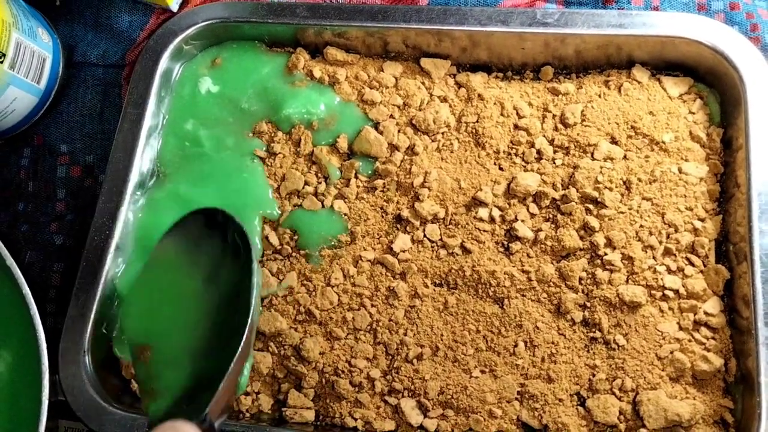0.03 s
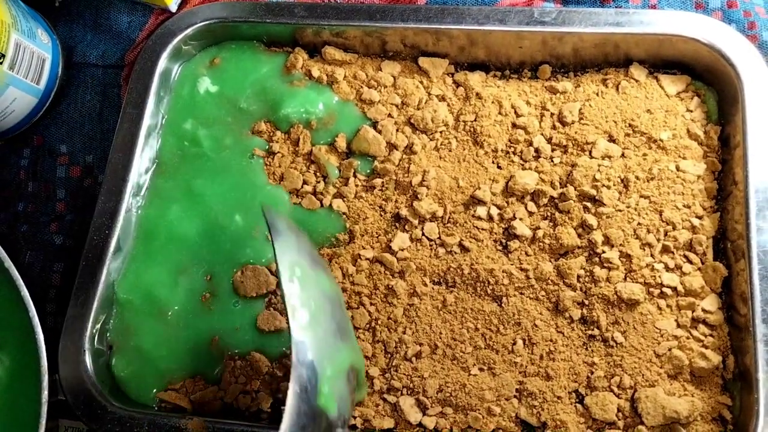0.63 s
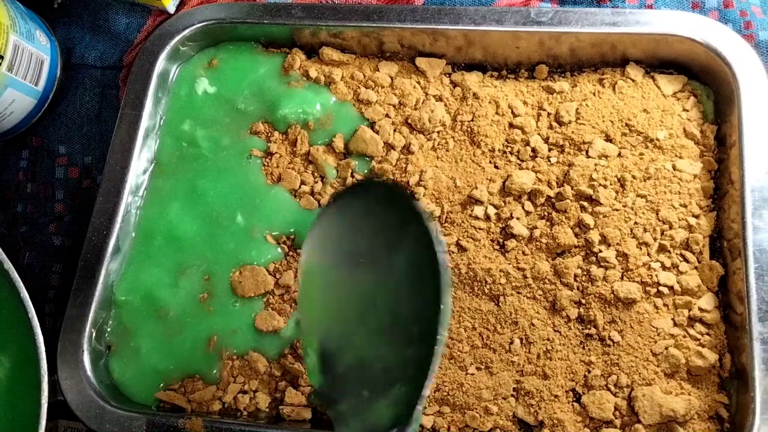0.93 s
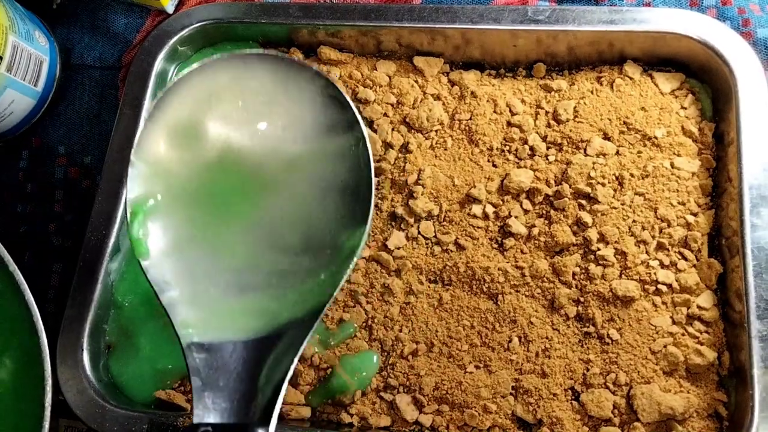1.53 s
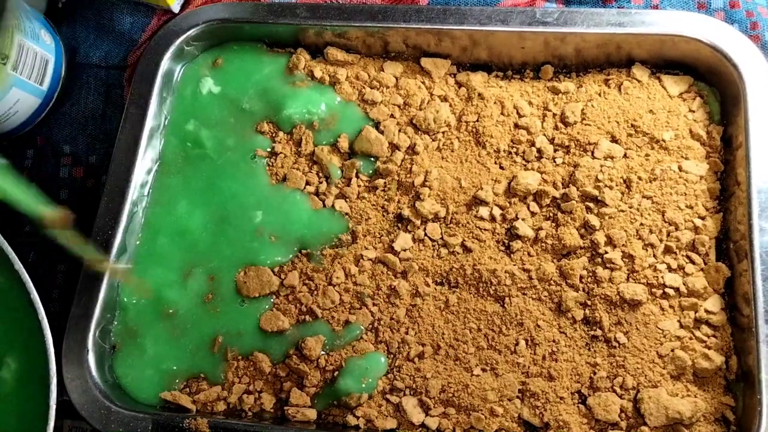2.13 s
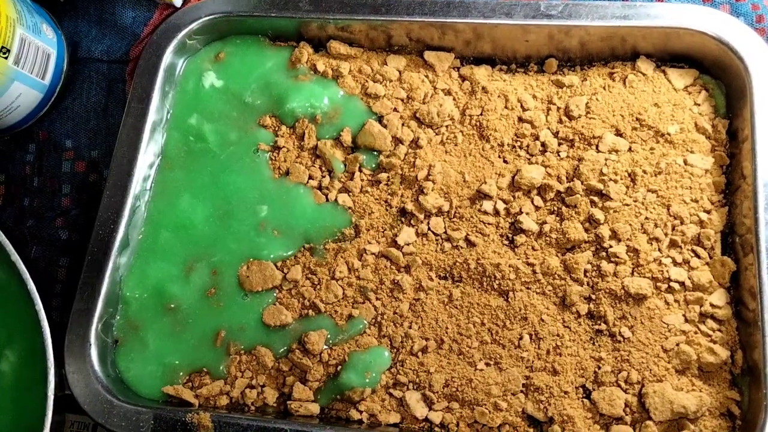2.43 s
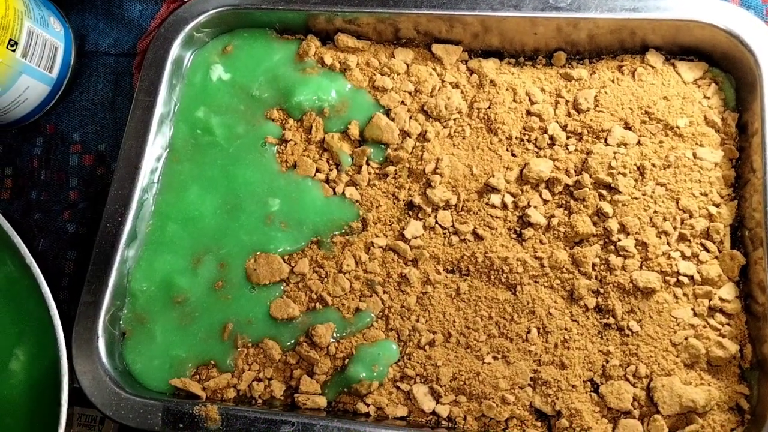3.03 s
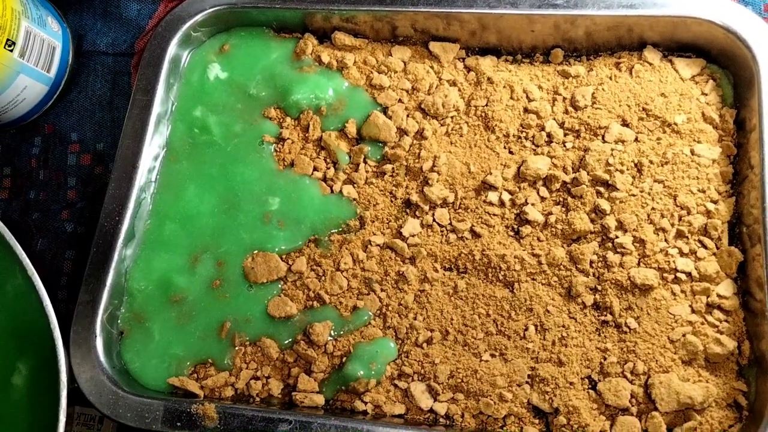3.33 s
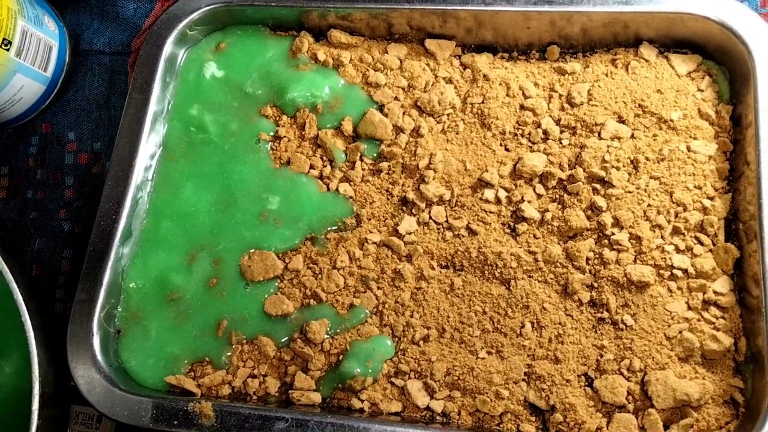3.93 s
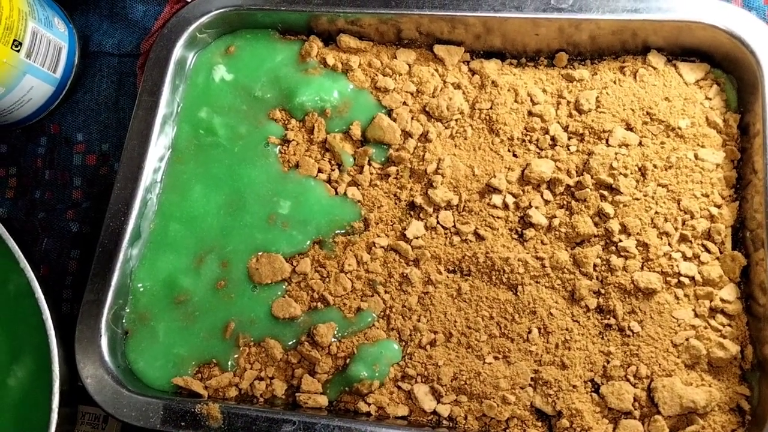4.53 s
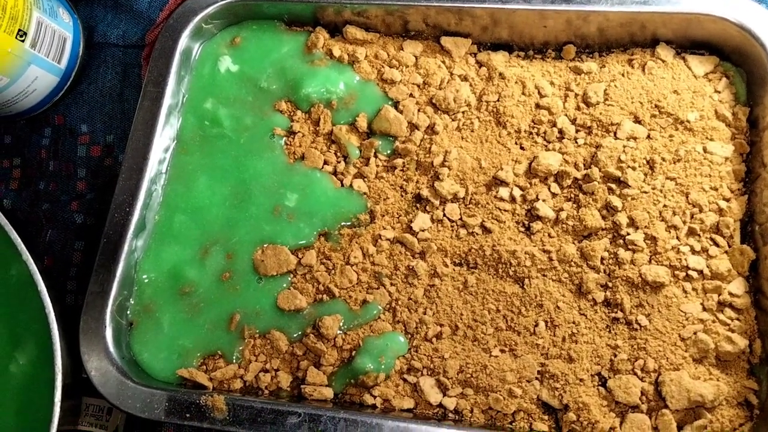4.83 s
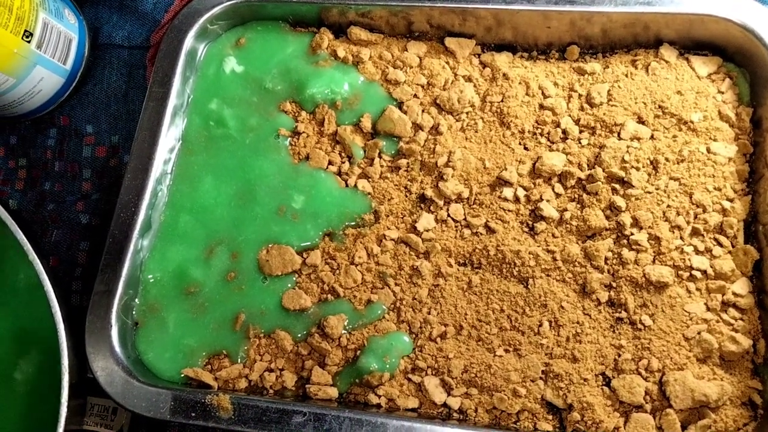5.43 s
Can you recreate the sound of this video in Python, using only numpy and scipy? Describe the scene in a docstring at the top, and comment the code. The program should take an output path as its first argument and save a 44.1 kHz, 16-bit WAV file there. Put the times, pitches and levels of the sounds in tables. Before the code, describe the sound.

A cream-coated metal spoon clinks a few times as it is laid in a metal bowl, then scrapes briefly, over a faint hum.

```python
"""Tiny wet smacks, then short metal clinks and a scrape: a creamy steel spoon is laid in a metal bowl.
The smacks are cream peeling off the spoon as it lifts from a tray of cream and crumbs.
The spoon knocks twice, drops, tips against the rim and slides to rest. Each knock rings bowl and spoon,
but the cream soon stops them. In the quiet kitchen an appliance hums; faint hoots come from afar."""
import sys
import numpy as np
from scipy import signal
from scipy.fft import rfft, irfft
from scipy.io import wavfile

SR = 44100
rng = np.random.default_rng(int(sys.argv[2]) if len(sys.argv) > 2 else 0)


def materialize(psi):
    """Save the field psi as 16-bit PCM at rate SR to the path in sys.argv[1].

    A 1-D psi becomes a single channel; in a 2-D psi each row is a channel.
    """
    bounded = np.clip(np.atleast_2d(psi).T, -1, 1)
    quanta = np.round(bounded * 32767).astype(np.int16)
    wavfile.write(sys.argv[1], SR, quanta)


N = 246078
WALL, BOTTOM, RIM = 0, 1, 2  # places where the spoon hits the bowl


def amp(db):
    """Turns decibels into a number to multiply a sound by."""
    return 10 ** (np.asarray(db) / 20)


def unit(x):
    """Scales a sound to an average (rms) level of 1."""
    return x / np.sqrt(np.mean(x ** 2) + 1e-20)


def read_curve(points, hz):
    """Looks up a value between the (pitch_hz, value) points of a curve, on a musical pitch scale."""
    point_hz, value = np.transpose(points)
    return np.interp(np.log(hz + 1), np.log(point_hz + 1), value)


def add(mix, start_s, sound):
    """Mixes a sound in at the given time."""
    part = mix[round(start_s * SR):][:len(sound)]
    part += sound[:len(part)]


def colour(x, curve):
    """Makes each pitch louder or softer along a curve, then sets the level to 1."""
    gain = amp(read_curve(curve, np.fft.rfftfreq(len(x), 1 / SR)))
    return unit(irfft(rfft(x) * gain, len(x)))


def white(size):
    """Hiss that is equally strong at every pitch."""
    return unit(irfft(np.exp(2j * np.pi * rng.random(size // 2 + 1)), size))


def band(pitch_hz, spread_hz, size):
    """Noise around one pitch, reaching about spread_hz to each side."""
    hz = np.fft.rfftfreq(size, 1 / SR)
    return unit(irfft(rfft(white(size)) / (1 + ((hz - pitch_hz) / spread_hz) ** 4), size))


def fade(t, fade_s, rise_s):
    """A level that rises quickly, then falls by 60 dB every fade_s."""
    return (1 - np.exp(-t / rise_s)) * np.exp(-np.log(1000) * t / fade_s)


def room_noise(level_db=-57.5):
    """A soft, steady rush in which a few pitches stand out."""
    # tone of the rush: pitch_hz, relative_db
    air_curve = [(20, 3), (40, -2), (75, -3.5), (103, -12.5), (135, -1.5), (200, -6), (420, -17),
                 (1400, -20), (1550, -23.5), (2000, -24), (2500, -29.5), (3500, -33.5), (5800, -35.5),
                 (7000, -31), (7600, -27), (8000, -39.5), (8600, -55)]
    # pitches that stand out: pitch_hz, width_hz, level_db
    air_peaks = [(489, 55, -78), (656, 23, -79.5), (743, 16, -86), (874, 8.8, -80.5), (972, 89, -81),
                 (1288, 110, -82), (1383, 37, -79.5)]
    peaks = sum(amp(db) * band(hz, width_hz / 2, N) for hz, width_hz, db in air_peaks)
    return amp(level_db) * colour(white(N), air_curve) + peaks


def appliance_hum(waver=0.14):
    """An appliance hums on three low tones, each wavering a little in level."""
    # tones of the hum: pitch_hz, level_db
    hum_tones = [(120, -61.5), (301, -76), (355, -77.5)]
    out, t = np.zeros(N), np.arange(N) / SR
    for hz, db in hum_tones:
        tone = np.sqrt(2) * np.sin(2 * np.pi * (hz * t + rng.random()))
        out += amp(db) * tone * (1 + waver * band(0, 2.3, N))
    return out


def kitchen_echo(x, first_echo_s=.006, echoes_per_s=3000):
    """Sound bounces around the kitchen; the high pitches die first."""
    # how long the echo lasts: pitch_hz, fade_s
    echo_fades = [(100, 0.62), (1000, 0.26), (4000, 0.23), (8000, 0.19)]
    echoes = rng.choice([-1., 1.], 2 ** 15) * (rng.random(2 ** 15) < echoes_per_s / SR)
    echoes *= np.arange(len(echoes)) > first_echo_s * SR
    hz, t, spectrum = signal.stft(echoes, SR, nperseg=256)
    decay = np.exp(-np.log(1000) * t / read_curve(echo_fades, hz)[:, None])
    tail = signal.istft(spectrum * decay, SR, nperseg=256)[1]
    return signal.fftconvolve(x, tail / np.linalg.norm(tail))[:N]


def far_hoots(length_s=.095, spread_hz=140):
    """Short, soft hoots, blurred by distance."""
    # each hoot: start_s, level_db, pitch_hz
    hoots = [(.19, -67.5, 796), (.815, -65, 900), (1.274, -59.5, 1000), (3.105, -60, 840),
             (4.821, -65.5, 1360)]
    out, swell = np.zeros(N), signal.windows.tukey(int(length_s * SR), .7)
    for start_s, db, hz in hoots:
        add(out, start_s, amp(db) * band(hz, spread_hz, 2 ** 14)[:len(swell)] * swell)
    return out


def cream_smacks(spread_share=0.088):
    """Threads and films of cream snap with a short, high fizz."""
    # each snap: start_s, level_db, pitch_hz
    smacks = [(.157, -76, 5000), (0.6275, -66.5, 7200), (0.9962, -59, 6500), (1.0212, -56.5, 7260),
              (1.119, -71.5, 2570), (2.152, -67.5, 7170), (2.239, -67.5, 7150), (2.4753, -67.5, 7000),
              (2.725, -70, 7300), (2.818, -68.5, 7160), (3.057, -64.5, 7270), (3.315, -68, 6900)]
    out, t = np.zeros(N), np.arange(2 ** 14) / SR
    for start_s, db, hz in smacks:
        fizz = band(hz, spread_share * hz, len(t))
        add(out, start_s, amp(db) * fizz * fade(t, fade_s=.26, rise_s=0.00063))
    return out


def table_thud(t):
    """The table shakes briefly under the bowl."""
    # low tones of the table: pitch_hz, fade_s, relative_db
    table_tones = [(25.5, 0.18, -12), (136.2, 0.087, -1), (174, 0.15, -11.5)]
    return sum(amp(db) * fade(t, fade_s, rise_s=0.0057) * np.sin(2 * np.pi * hz * t)
               for hz, fade_s, db in table_tones)


def bowl_and_spoon_ring(place, t, treble_db=0, early_boost=0.7, early_fade_s=0.058, rise_cycles=1.5):
    """Bowl and spoon lose part of their swing to the cream at once, then ring on together."""
    # tones of bowl and spoon ringing together: pitch_hz, fade_s, wall_hit_db, bottom_hit_db, rim_hit_db
    bowl_and_spoon_tones = [(174, .16, -46, -48, -49), (195, .18, -45, -52, -45), (465, .14, -54, -49, -59),
                            (521, .12, -48, -34, -58), (560, .06, -58, -30, -55), (648, .07, -52, -44, -45),
                            (746, .23, -51, -59, -49), (794, .2, -61, -46, -58), (845, .15, -66, -42, -51),
                            (886, .18, -63, -46, -37), (931, .22, -67, -31, -52), (938, .12, -68, -54, -58),
                            (945, .05, -60, -23, -46), (1265, .16, -54, -52, -47),
                            (1305, .2, -43, -56, -52), (1340, .14, -49, -38, -60),
                            (1394, .21, -56, -44, -59), (1500, .07, -48, -54, -51),
                            (1958, .08, -45, -51, -52), (2053, .17, -63, -43, -64),
                            (4240, .22, -69, -58, -64), (4436, .25, -68, -70, -59),
                            (4640, .24, -68, -70, -55), (5385, .18, -69, -62, -50),
                            (5550, .2, -67, -63, -62), (6340, .15, -72, -59, -54),
                            (6817, .15, -62, -48, -60), (7422, .22, -56, -52, -55),
                            (7458, .22, -59, -50, -54), (7680, .16, -65, -49, -50)]
    top_hz = bowl_and_spoon_tones[-1][0]
    ring = np.zeros(len(t))
    for k, (hz, fade_s, *place_db) in enumerate(bowl_and_spoon_tones):
        gain = (-1) ** k * amp(place_db[place] + treble_db * hz / top_hz)  # every other tone is flipped
        ring += gain * fade(t, fade_s, rise_cycles / hz) * np.sin(2 * np.pi * hz * t)
    return ring * (1 + early_boost * np.exp(-np.log(1000) * t / early_fade_s))


def soft_bump(start_s=2.2035, ring_db=-9.5, thud_db=-30.5, top_hz=475):
    """One slow, cushioned touch on the bottom shakes only the table and the metal's low tones."""
    out, t = np.zeros(N), np.arange(2 ** 14) / SR
    keep_lows = signal.butter(4, top_hz, fs=SR, output="sos")
    low_ring = signal.sosfilt(keep_lows, bowl_and_spoon_ring(BOTTOM, t))
    add(out, start_s, amp(ring_db) * low_ring + amp(thud_db) * table_thud(t))
    return out


def spoon_slide(jerks_per_s=4000, uneven_db=3, edge_db=-19, fizz_db=-4, sing_db=-3, sing_lag_s=.015):
    """Steel slips down steel in three goes, each made of tiny jerks that keep the metal singing."""
    # each go: fastest_s, level_db, rise_s, stop_s, extra_fizz_db
    slips = [(3.722, -60.5, 0.017, .022, 5), (3.771, -55.5, 0.025, 0.031, 6),
             (3.956, -44, 0.054, 0.037, -0.5)]
    # tone of the low rasp: pitch_hz, relative_db
    rasp_curve = [(150, -27), (450, -4.5), (750, 0), (1000, 3), (1300, 4), (1650, -3.5), (1960, 9.5),
                  (2250, -15), (2650, -3.5), (3300, -41), (5000, -51)]
    # tone of the high fizz: pitch_hz, relative_db
    fizz_curve = [(2500, -37), (3700, -17), (4400, -0.5), (5100, -11.5), (5500, -2), (5950, -13),
                  (6650, 1.5), (7100, -4), (7600, 0), (8000, -12.5), (8600, -43)]
    # tones that the rubbing keeps going: pitch_hz, width_hz, relative_db
    singing_tones = [(471, 12, -5.5), (881, 22, -6), (1265, 52, -19), (1308, 42, -3.5), (1958, 35, -6),
                     (4290, 190, -13.5), (5600, 52, -18)]
    t = np.arange(N) / SR
    jerks = (rng.random(N) < jerks_per_s / SR) * rng.choice([-1, 1], N)
    jerks = jerks * amp(uneven_db * rng.uniform(-0.66, 1, N))
    rub_level, fizz_level = np.zeros((2, N))
    for fastest_s, db, rise_s, stop_s, extra_fizz_db in slips:
        progress = (t - fastest_s) / np.where(t < fastest_s, rise_s, stop_s)  # -1 at start, 1 at stop
        swell = amp(db + edge_db * progress ** 2)
        rub_level += swell
        fizz_level += amp(fizz_db + extra_fizz_db) * swell
    # the singing builds up and dies a little after the rubbing
    hold = np.exp(-1 / (sing_lag_s * SR))
    sing_level = amp(sing_db) * signal.lfilter([1 - hold], [1, -hold], rub_level + 1e-18)
    singing = sum(amp(db) * band(hz, width_hz / 2, N) for hz, width_hz, db in singing_tones)
    scrape = rub_level * colour(jerks, rasp_curve) + fizz_level * colour(jerks, fizz_curve)
    return scrape + sing_level * singing


def spoon_knocks(thud_db=-33.5, rattle_db=-18, ring_growth=1.15):
    """Each knock rings bowl and spoon, clacks and shakes the table; a harder one sounds brighter."""
    # each knock: start_s, place, force_db, hardness_db (high for bare steel, low through cream)
    knocks = [(1.8040, WALL, 1, -0.5), (1.8875, WALL, -4, 5), (1.8990, WALL, -24.5, 20.5),
              (1.917, WALL, -25, 8), (1.9712, WALL, -35.5, 17), (2.3420, WALL, -19, -3),
              (2.5652, BOTTOM, 0, 4), (2.6190, BOTTOM, -22, -4), (2.8660, WALL, -37, 13),
              (2.8783, WALL, -36.5, 18), (3.6598, RIM, -2, 5)]
    # how the wall, bottom and rim answer: clack_db, tick_db, treble_db
    places = [(-33.5, -33, -4.5), (-27, -23, -14), (-27.5, -27, -2)]
    # dull clack of many quickly dying tones in bowl and spoon: pitch_hz, relative_db
    clack_curve = [(120, -24), (300, -6), (450, -0.5), (650, -1), (930, 2.5), (1120, -9), (1380, 2),
                   (1720, -16), (1980, 4.5), (2250, -12.5), (2750, -9.5), (3400, -18), (6000, -45)]
    # tone of the bright tick: pitch_hz, relative_db
    tick_curve = [(1500, -39), (2900, -17), (3500, -26), (4000, -8.5), (4400, -3), (5100, -5.5), (5500, -3),
                  (6000, -9), (6500, -3), (7000, 0.5), (7500, 5.5), (7900, -13), (8400, -27.5),
                  (9200, -45.5)]
    out, t = np.zeros(N), np.arange(2 ** 14) / SR
    rattle = amp(rattle_db) * fade(t, fade_s=0.062, rise_s=.002)  # thin steel lets the tick linger
    for start_s, place, force_db, hardness_db in knocks:
        clack_db, tick_db, treble_db = places[place]
        clack = colour(white(len(t)), clack_curve) * fade(t, fade_s=0.037, rise_s=0.00057)
        tick = colour(white(len(t)), tick_curve) * (fade(t, fade_s=0.02, rise_s=0.00042) + rattle)
        contact = amp(clack_db) * clack + amp(tick_db + hardness_db) * tick + amp(thud_db) * table_thud(t)
        # the ring grows faster than the force: cream swallows most of a light touch
        ring = amp(ring_growth * force_db) * bowl_and_spoon_ring(place, t, treble_db + hardness_db)
        add(out, start_s, ring + amp(force_db) * contact)
    return out


def scene(echo_db=-13):
    """Spoon, cream and hoots echo in the kitchen over its steady hum and noise."""
    sounds = spoon_knocks() + soft_bump() + spoon_slide() + cream_smacks() + far_hoots()
    return (sounds + amp(echo_db) * kitchen_echo(sounds) + appliance_hum() + room_noise())[None]


def record(dry):
    """Cuts away the highest treble, above 8700 Hz."""
    treble_cut = signal.firwin(255, 8700, window=("kaiser", 8), fs=SR)
    return signal.oaconvolve(dry, treble_cut[None], "same")


dry = scene()
out = record(dry)
materialize(out)
```